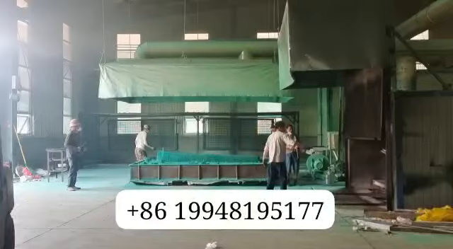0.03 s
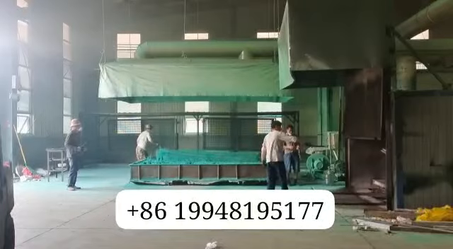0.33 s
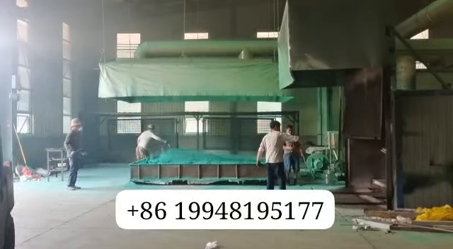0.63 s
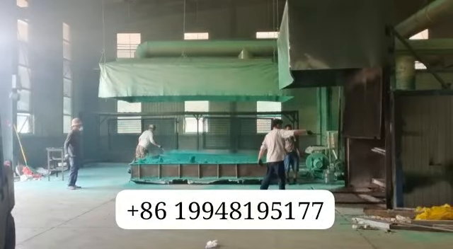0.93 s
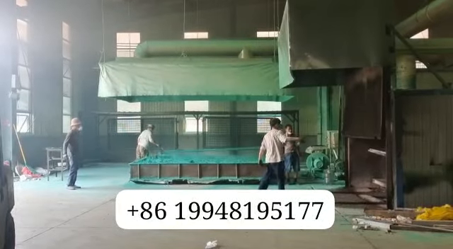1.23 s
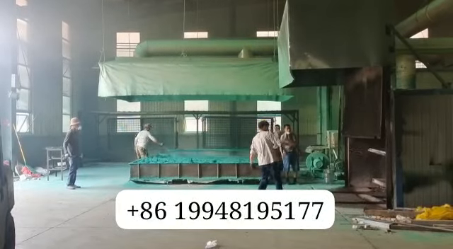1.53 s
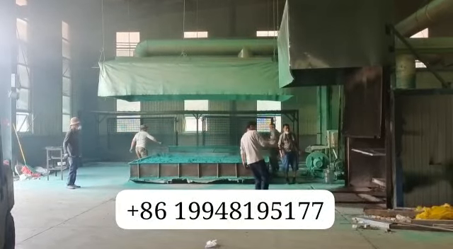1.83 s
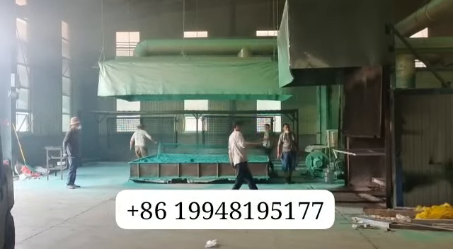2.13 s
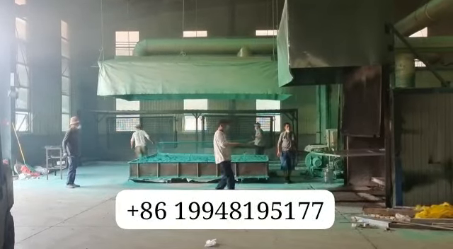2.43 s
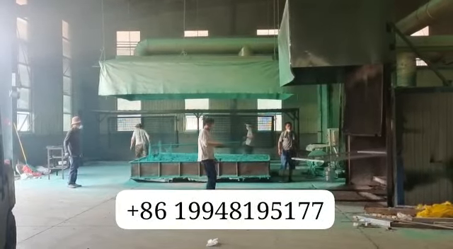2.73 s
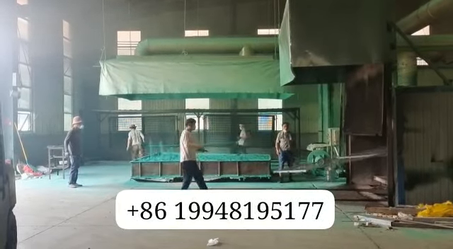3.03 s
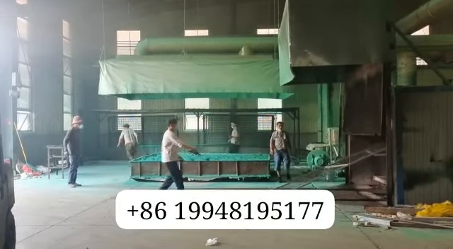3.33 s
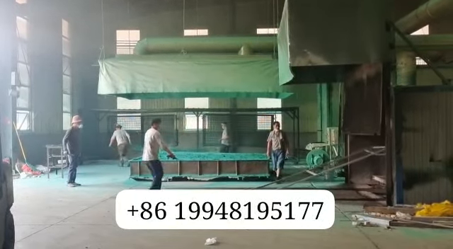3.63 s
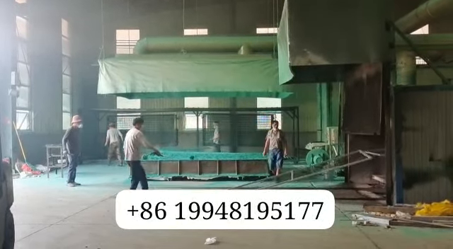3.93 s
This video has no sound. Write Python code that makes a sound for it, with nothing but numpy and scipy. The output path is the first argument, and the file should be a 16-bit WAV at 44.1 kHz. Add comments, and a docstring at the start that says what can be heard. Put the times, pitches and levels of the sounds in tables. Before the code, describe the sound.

Steel scrapes across a concrete floor in a big factory hall, over constant rumbling ventilation. After a soft knock and a booming thump, the gritty scraping builds, with thin squeals and several clanks echoing around a phone microphone.

```python
"""A long steel frame is dragged over the concrete of a big factory hall, in pulls that grow louder.
Stick-slip clicks ring the steel: grit hisses, the bars rasp and sing and, near the end, judder and clank.
All round a stereo phone microphone, ducts rumble with turbulent air and extraction fans add wavering tones.
Early on come a soft knock and a booming thump. The hall's echoes smear the scrape, clanks and knock."""
import sys
import numpy as np
from scipy import signal
from scipy.fft import rfft, irfft
from scipy.io import wavfile

SR = 44100
rng = np.random.default_rng(int(sys.argv[2]) if len(sys.argv) > 2 else 0)


def dump_mix(stems):
    """Bounce the given channels to the path in sys.argv[1] as a 16-bit WAV at rate SR."""
    frames = np.atleast_2d(stems).T  # one column per channel
    limited = np.clip(frames, -1, 1)  # hard clip at full scale
    pcm = np.round(limited * 32767).astype(np.int16)
    wavfile.write(sys.argv[1], SR, pcm)


N = 176400


def undb(db):
    return 10 ** (np.asarray(db) / 20)


def unit(x):
    return x / np.sqrt(np.mean(x ** 2))


def bins_hz():
    return np.maximum(np.arange(N // 2 + 1) * SR / N, 1)


def over_hz(points):
    """Gain per frequency from rows of freq_hz, level_db."""
    hz, db = np.array(points).T
    return undb(np.interp(np.log(bins_hz()), np.log(hz), db))


def over_time(rows):
    """One gain curve for each level_db column after time_s."""
    times, *columns = np.array(rows).T
    return [undb(np.interp(np.arange(N) / SR, times, db)) for db in columns]


def colour(x, gain):
    return irfft(rfft(x) * gain, N)


def pan(x, points):
    """Tilt each frequency to the left or right."""
    left = np.sqrt(over_hz(points))
    return colour(x, np.array([left, 1 / left]))


def resonance(hz, width_hz):
    return 1 / (1 + 2j * (bins_hz() - hz) / width_hz)


def walk(rate_hz):
    """Smooth random drift with spread 1."""
    return unit(colour(rng.standard_normal(N), np.exp(-(bins_hz() / rate_hz) ** 2)))


def burst(start_s, db, decay_s, response):
    """A blow: coloured noise that starts at once and dies away."""
    age = np.arange(N) / SR - start_s
    noise = unit(colour(rng.standard_normal(N), response))
    return noise * (age > 0) * np.exp(-abs(age) / decay_s) * undb(db)


def hall(x, near_decay_s=.013, t60_s=.71, build_s=.0056, right_lag_s=.00006):
    """At the microphone, quick echoes off floor and machines and a long tail outweigh the direct sound."""
    t = np.arange(N) / SR
    direct_gain, tail_gain = undb(-5), undb(-1)
    near = rng.standard_normal((2, N)) * np.exp(-t / near_decay_s)
    tail = rng.standard_normal((2, N)) * undb(-60 * t / t60_s) * (1 - np.exp(-t / build_s))
    echoes = (unit(near) + tail_gain * unit(tail)) / np.sqrt(N)
    direct = np.array([x, colour(x, np.exp(-2j * np.pi * bins_hz() * right_lag_s))])
    wet = signal.fftconvolve(x[None], echoes, axes=1)[:, :N]
    return (direct_gain * direct + wet) / np.sqrt(1 + direct_gain ** 2 + tail_gain ** 2)


# Colour of the duct roar that fills the hall: freq_hz, level_db
ROAR_SPECTRUM = [(20, -44.5), (35, -18.5), (48, -10.5), (68, -9.5), (80, -12.5), (105, -9), (135, -1),
                 (205, 1), (222, -1.5), (250, -0.5), (285, -6.5), (370, -5.5), (480, -11), (680, -19),
                 (870, -16), (1050, -21.5), (1300, -19.5), (1700, -27), (2300, -23), (3200, -32),
                 (5000, -42), (7200, -45), (9500, -68.5), (15000, -67)]
# Its width at the microphone: freq_hz, side_minus_mid_db
ROAR_WIDTH = [(30, -28), (130, -20.5), (250, -13), (500, -7), (900, 0), (15000, -1.5)]
# Its lean to one side: freq_hz, left_minus_right_db
ROAR_BALANCE = [(100, -1.5), (600, -0.3), (1200, -1.5), (2500, 4.5), (6000, 9.5), (12000, -4)]
# Rise and fall of the whole roar, and of its deepest rumble: time_s, gain_db
ROAR_SWELL = [(.25, -28), (.35, -22.5), (.8, -21.5), (1.3, -19.5), (1.55, -22), (2.2, -22), (2.9, -21),
              (4, -20)]
BASS_SWELL = [(.3, -6), (1, -3), (1.7, -1.5), (2.3, 1), (4, -.5)]


def ventilation(flicker_db=.17, swell_db=.5):
    """Turbulent duct air: octaves swell together and flicker alone; the bass is alike left and right."""
    mid, side = rng.standard_normal((2, N))
    width = over_hz(ROAR_WIDTH)
    air = mid + colour(side, width) * np.array([[1], [-1]])
    air = colour(air, over_hz(ROAR_SPECTRUM) / np.sqrt(1 + width ** 2))
    roar = 0
    for octave in range(4, 15):  # centred on 2 ** octave Hz
        band = np.maximum(1 - abs(np.log2(bins_hz()) - octave), 0)
        bass_gain = over_time(BASS_SWELL)[0] if octave < 7 else 1
        roar = roar + colour(air, band) * bass_gain * undb(flicker_db * walk(rate_hz=36))
    swell = undb(swell_db * walk(rate_hz=1.15)) * over_time(ROAR_SWELL)[0]
    return pan(unit(roar), ROAR_BALANCE) * swell


# Fans and motors around the hall: pitch_hz, width_hz, level_db, side_gain, steady_power_share
BLADE_TONES = [(242.1, 14, -25.5, 0.16, .55), (399, 5.8, -32, 0.43, .75), (590.6, 2.1, -43.5, 0.8, 0.69),
               (148.7, 7.3, -33, 0.13, 0.44), (1890, 6, -52, .8, .7), (2860, 5.1, -57.5, .8, 0.88)]
# The second tone swells midway: time_s, gain_db
WHINE_SWELL = [(1.7, -15.5), (1.9, 6.5), (2.3, 2.5), (2.6, -5), (3.1, -7.5), (3.4, -3)]


def fans(waver_hz=1.0):
    """Blade tones and motor whines: a steady core and a wavering part scattered by the hall."""
    out = 0
    for k, (hz, width, db, side_gain, steady) in enumerate(BLADE_TONES):
        band = resonance(hz, 2 * width) ** 2
        mid, side = (unit(colour(noise, band)) for noise in rng.standard_normal((2, N)))
        pitch_hz = hz + waver_hz * walk(rate_hz=2.56)
        core = unit(np.sin(2 * np.pi * np.cumsum(pitch_hz) / SR))
        scattered = np.sqrt(1 - steady) * mid + side_gain * side * np.array([[1], [-1]])
        swell = over_time(WHINE_SWELL)[0] if k == 1 else 1
        out = out + undb(db) * (np.sqrt(steady) * core + scattered) * swell
    return out


# Colour of a knock out in the hall: freq_hz, level_db
KNOCK_SPECTRUM = [(400, 3), (800, 7), (2400, -1), (4000, -9), (7000, -9), (9500, -30), (15000, -44)]


def knock():
    """One soft blow that reaches the microphone mostly as echo."""
    return hall(burst(start_s=.592, db=-31, decay_s=.05, response=over_hz(KNOCK_SPECTRUM)))


def slips(per_s=500, scatter_db=1.5, chatter_hz=57, chatter_db=1.5):
    """Steel sticks and slips on concrete: dense clicks of uneven, fluttering strength."""
    hit = rng.random(N) < per_s / SR
    size = undb(scatter_db * np.minimum(rng.exponential(size=N), 4))
    polarity = np.sign(rng.standard_normal(N))
    return hit * size * polarity * undb(chatter_db * walk(chatter_hz))


# The pulls across the floor: time_s, grit_db, rasp_db, judder_db
PULLS = [(.7, -49.5, -59, -48.5), (.82, -45.5, -52, -49), (.89, -40, -42.5, -42), (1.08, -36, -34.5, -44),
         (1.35, -41.5, -38.5, -64), (1.7, -43.5, -41, -52), (1.78, -34, -30, -39), (1.89, -32, -30.5, -37),
         (2.15, -32, -32.5, -36.5), (2.35, -34, -33, -31.5), (2.89, -38, -32.5, -34),
         (2.95, -29.5, -27.5, -31), (3.08, -28, -25.5, -30.5), (3.24, -27.5, -25.5, -33.5),
         (3.39, -31.5, -32.5, -31.5), (3.445, -26.5, -24, -22), (3.53, -29, -26.5, -29),
         (3.63, -38, -29.5, -36), (3.675, -25, -18.5, -28), (3.74, -25.5, -21, -22.5),
         (3.84, -33.5, -27, -32.5), (3.92, -30, -23, -22), (4, -27, -22.5, -28.5)]
# Colours of the grit's hiss, the bars' rasp and their low judder: freq_hz, level_db
GRIT_SPECTRUM = [(1500, -34), (3000, -4), (3900, -3.5), (4350, 2), (4950, -4.5), (6000, -11.5),
                 (7500, -17.5), (9500, -27.5), (11000, -26.5), (13000, -21.5), (15500, -25)]
RASP_SPECTRUM = [(600, -35), (1200, -11), (1700, -4), (2100, -0.5), (2450, -.7), (2900, -3.5),
                 (3500, -12.5), (4500, -25), (7000, -39), (10000, -58)]
JUDDER_SPECTRUM = [(300, -12), (550, -3), (720, 0.5), (850, 1.5), (1050, 0), (1250, -0.5), (1600, -2),
                   (2500, -13), (5000, -27), (10000, -66)]
# Modes of the steel frame: pitch_hz, width_hz, gain_db
STEEL_MODES = [(860, 54, 6), (1225, 42, 1), (1328, 34, 3), (2082, 16, 1), (2230, 21, -2), (2370, 62, -1),
               (2875, 35, 0), (4290, 63, -6), (4770, 160, 0.5), (5420, 43, 1)]
# How the frame's sound leans at the microphone: freq_hz, left_minus_right_db
FRAME_BALANCE = [(500, -7.5), (1000, -1.5), (2200, 5.5), (4500, 2), (7000, 8.5), (9500, -1.5),
                 (13000, -5.5)]


def dragged_frame(contacts=3):
    """Slips at each point of contact with the floor ring the frame as hiss, rasp and judder."""
    mode_power = sum(abs(undb(db) * resonance(hz, width)) ** 2 for hz, width, db in STEEL_MODES)
    steel = np.sqrt(1 + mode_power)
    responses = [over_hz(shape) * steel for shape in (GRIT_SPECTRUM, RASP_SPECTRUM, JUDDER_SPECTRUM)]
    out = 0
    for _ in range(contacts):
        clicks, ring = slips(), 0
        for k, (response, gain) in enumerate(zip(responses, over_time(PULLS))):
            # neighbouring parts are a quarter cycle apart, so their powers add
            ring = ring + unit(colour(clicks, response * 1j ** k)) * gain
        out = out + hall(ring)
    return pan(out / np.sqrt(contacts), FRAME_BALANCE)


# The steel sings as it slides: start_s, length_s, pitch_hz, width_hz, level_db
STEEL_SQUEAKS = [(0.73, 0.16, 4560, 90, -50), (.9, .55, 4460, 220, -46), (1.83, 0.3, 5340, 110, -46),
                 (2.424, 0.49, 1216, 15, -39), (2.917, 0.18, 1219, 16, -32.5), (2.895, 0.17, 2610, 20, -39),
                 (3.365, 0.14, 862, 22, -29.5), (3.43, 0.65, 4290, 60, -41), (3.625, .11, 5420, 80, -43),
                 (3.685, .13, 1244, 13, -32)]


def squeaks(fade_s=.014):
    """Now and then friction holds one mode of the frame in a thin, rough tone."""
    t, out = np.arange(N) / SR, 0
    for start, length, hz, width, db in STEEL_SQUEAKS:
        ring = unit(colour(rng.standard_normal((2, N)), resonance(hz, 2 * width) ** 2))
        held = np.clip(np.minimum(t - start, start + length - t) / fade_s + .5, 0, 1)
        out = out + ring * held * undb(db)
    return pan(out, FRAME_BALANCE)


# Colour of the thump, centred at the microphone: freq_hz, level_db
THUMP_SPECTRUM = [(50, -22), (108, -2), (170, -5), (230, -14), (300, -3), (450, -28), (900, -8),
                  (2000, -52), (5000, -35), (10000, -80)]


def thump():
    """One dull, low blow, heard without echo."""
    return burst(start_s=1.12, db=-25, decay_s=.055, response=over_hz(THUMP_SPECTRUM))


# The boom that the thump sets off: pitch_hz, rise_s, peak_db
LOW_MODES = [(107, 0.027, -19.5), (141, .15, -23.5), (252, .13, -27)]


def boom(start_s=1.115):
    """Low modes of something large swell after the thump and die away."""
    age = np.maximum(np.arange(N) / SR - start_s, 0)
    return sum(undb(db) * age / rise * np.exp(1 - age / rise) * np.sin(2 * np.pi * hz * age)
               for hz, rise, db in LOW_MODES)


# Bars strike the concrete out in the hall: start_s, level_db, tilt_db_per_octave
BAR_DROPS = [(1.364, -36, -14), (3.44, -25.5, -4.5), (3.672, -31, -1), (3.735, -28, 4.5),
             (3.899, -22, -1.5)]


def clanks(decay_s=.026, tilt_from_hz=810):
    """A bar drops and rattles for a moment, ringing the modes of the frame."""
    steel = sum(undb(db) * resonance(hz, 2 * width) ** 2 for hz, width, db in STEEL_MODES)
    octaves = np.log2(np.maximum(bins_hz() / tilt_from_hz, 1))
    rattles = sum(burst(start, db, decay_s, steel * undb(tilt * octaves)) for start, db, tilt in BAR_DROPS)
    return pan(hall(rattles), FRAME_BALANCE)


def scene():
    return ventilation() + fans() + dragged_frame() + clanks() + squeaks() + knock() + thump() + boom()


def record(dry, start_s=.252, top_hz=15550):
    """The phone in the hall starts abruptly and cuts the highest treble."""
    running = np.clip((np.arange(N) / SR - start_s) / .001, 0, 1)
    lowpass = signal.ellip(10, .2, 80, top_hz, fs=SR, output="sos")
    return signal.sosfilt(lowpass, dry * running)


dry = scene()
out = record(dry)
dump_mix(out)
```